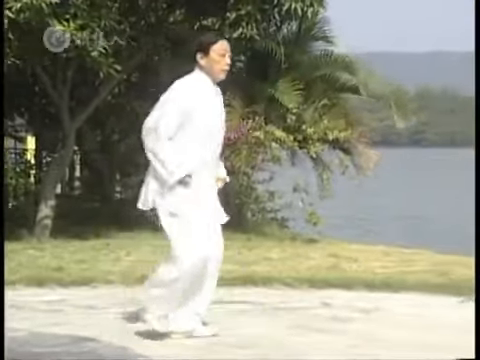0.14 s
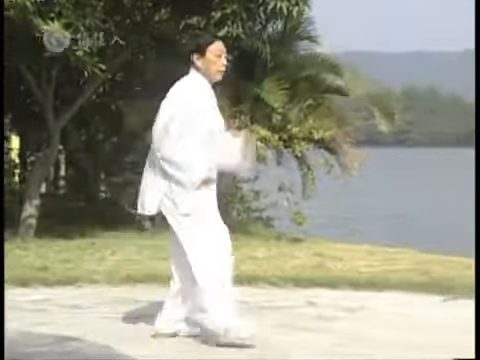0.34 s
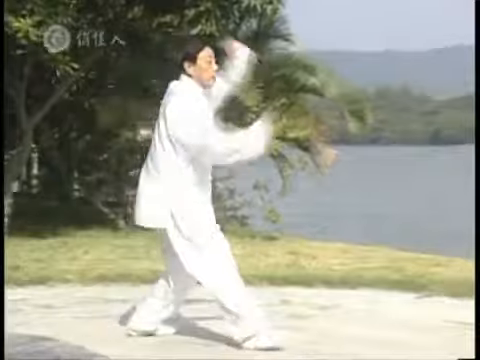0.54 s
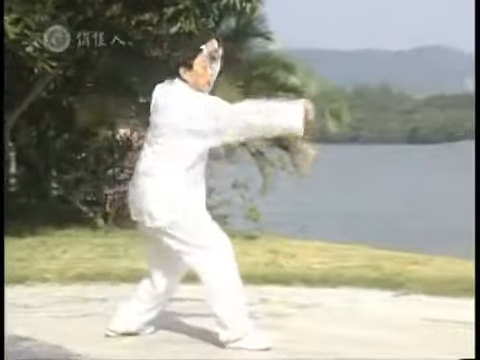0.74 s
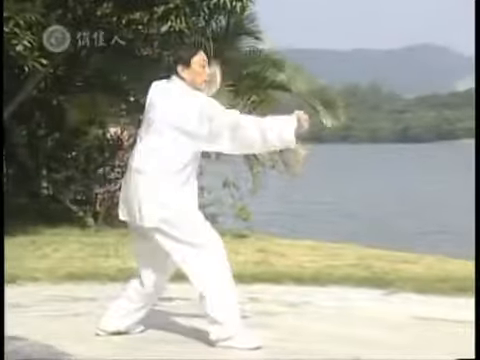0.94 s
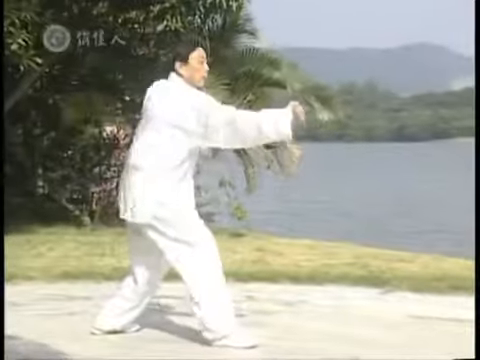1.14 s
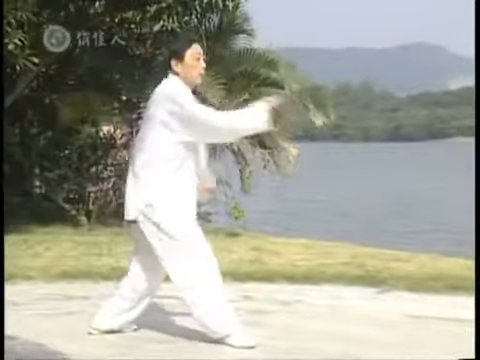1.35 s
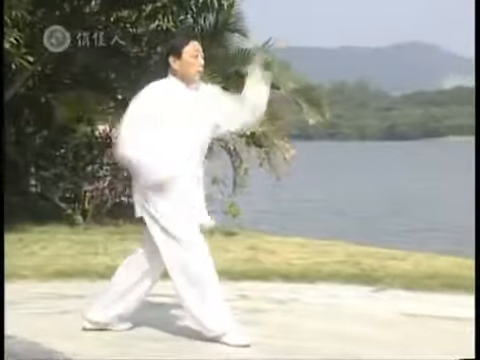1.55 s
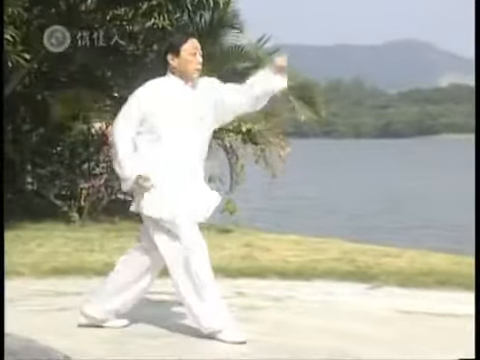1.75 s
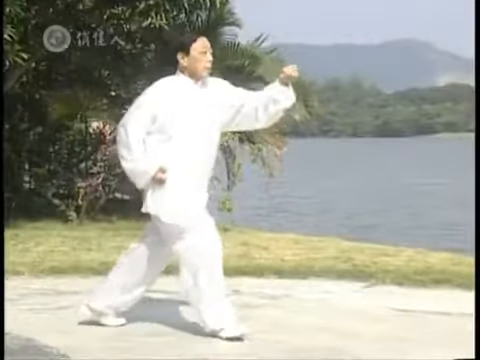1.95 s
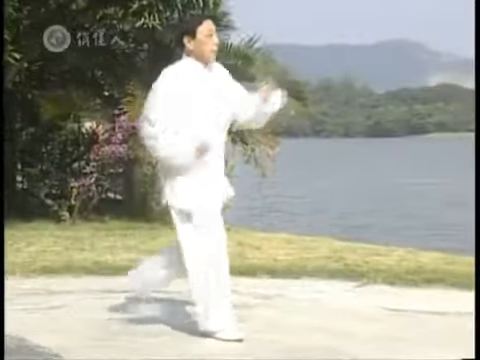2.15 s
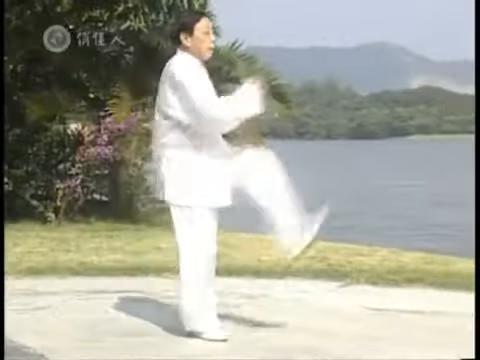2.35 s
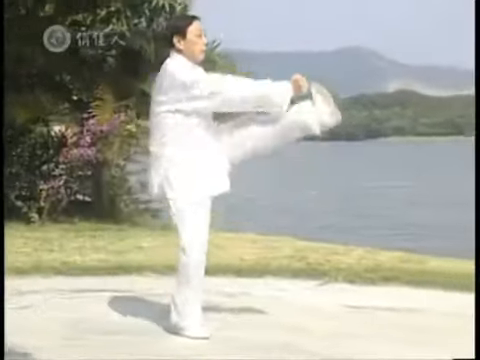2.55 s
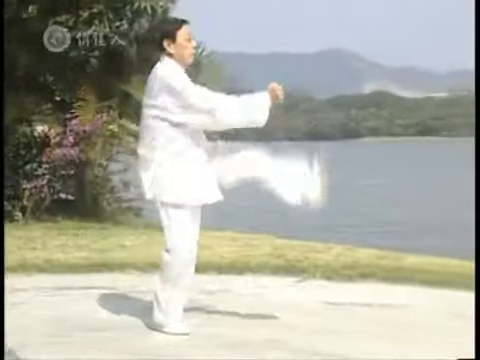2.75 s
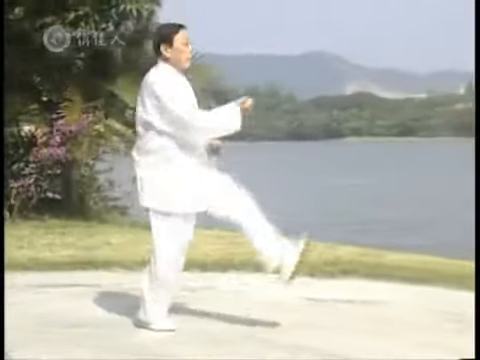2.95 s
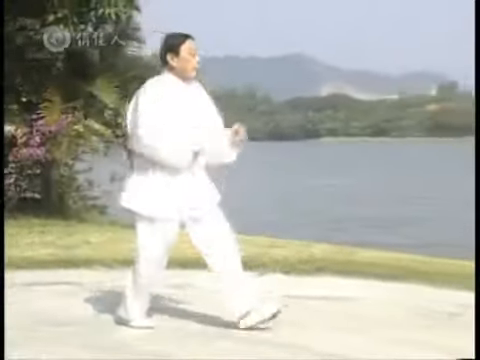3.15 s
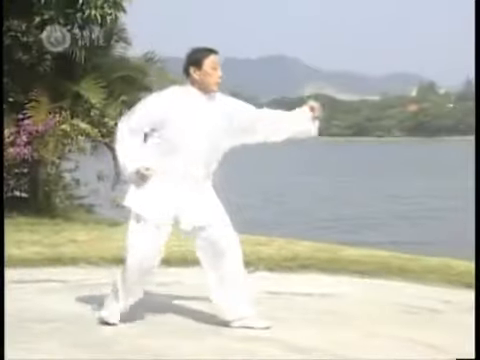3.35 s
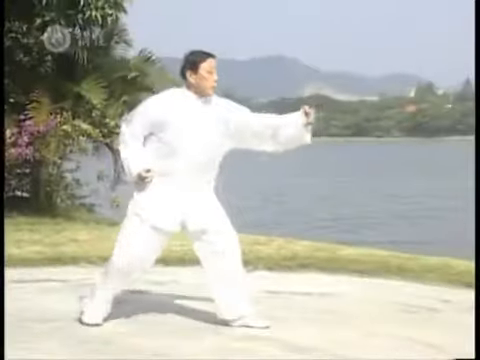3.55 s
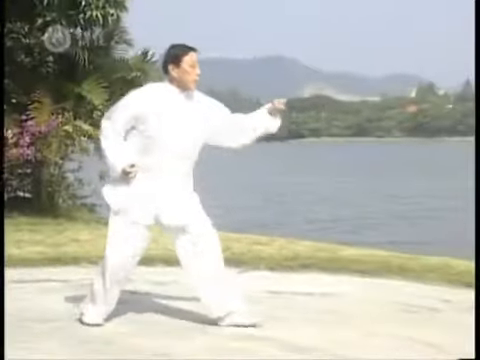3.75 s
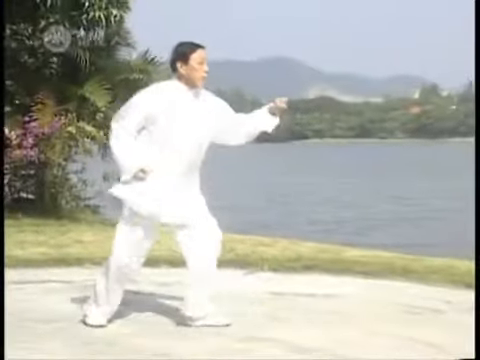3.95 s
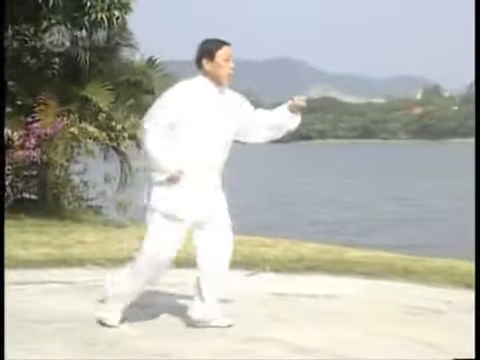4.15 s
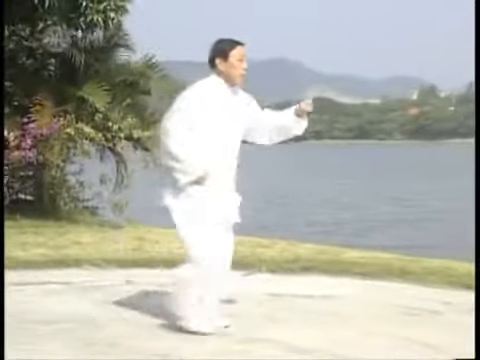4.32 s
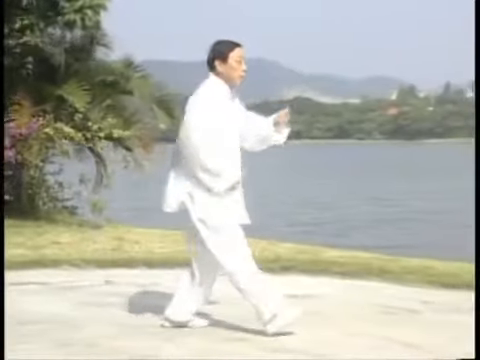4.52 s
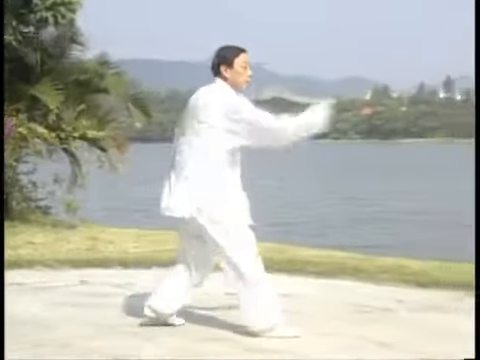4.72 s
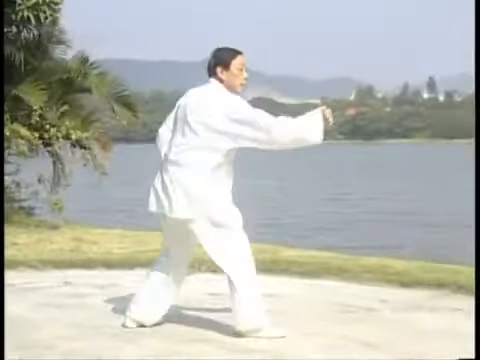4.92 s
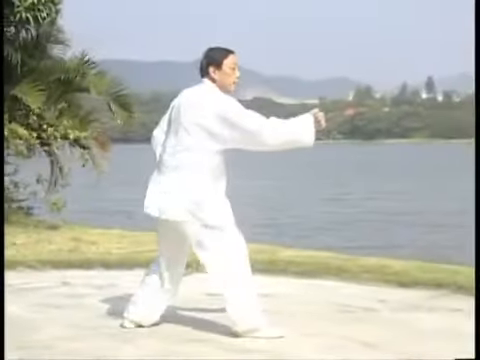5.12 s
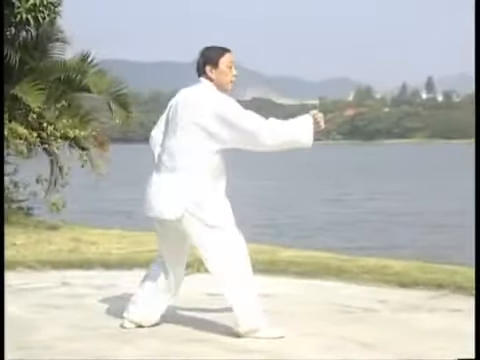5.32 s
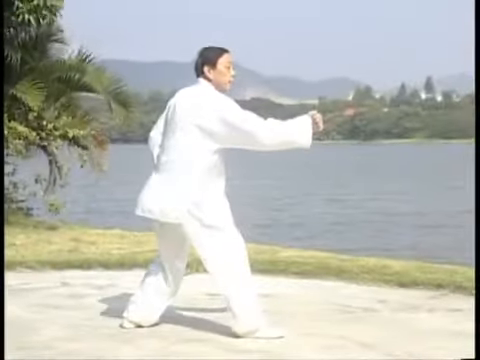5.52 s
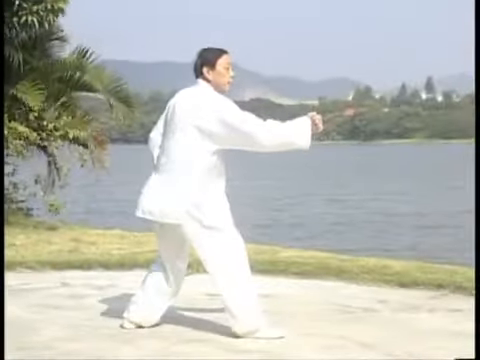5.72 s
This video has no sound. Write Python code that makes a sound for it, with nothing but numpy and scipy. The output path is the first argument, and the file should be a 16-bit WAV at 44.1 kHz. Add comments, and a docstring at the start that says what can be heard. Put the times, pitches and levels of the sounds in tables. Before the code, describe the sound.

Heard nearly in mono from a microphone worn on the body, loose clothing whips through a series of martial arts moves outdoors. It starts with a crackling flap and a thump, then swishes come in uneven clusters with dull footfalls on pavement, small dry ticks and sharp snaps of cloth dragging over the microphone. Near the end the movement settles, leaving light rustle over a faint far rumble, electrical hum and hiss.

```python
"""Loose clothing flaps and swishes fast around a body-worn microphone, outdoors.
Sleeves push air, cloth rubs on cloth, taut fabric crackles over the capsule and knocks,
folds and grit tick, steps and sudden stops thump through the body.
Under it lie a far rumble, a mains-like hum and a steady hiss, nearly mono."""
import sys
import numpy as np
from scipy.fft import rfft, irfft, next_fast_len
from scipy.io import wavfile
from scipy.ndimage import map_coordinates

SR = 44100
rng = np.random.default_rng(int(sys.argv[2]) if len(sys.argv) > 2 else 0)


def master_out(mix):
    """Clip the mix to full scale and print it as 16-bit PCM to the path in sys.argv[1]."""
    frames = np.transpose(np.atleast_2d(mix))
    ceiling = np.clip(frames, -1, 1)
    pcm = np.round(ceiling * 32767).astype(np.int16)
    wavfile.write(sys.argv[1], SR, pcm)


N = 254884

# Sleeve and trouser swings: t/s, rise/s, hold/s, fall/s, flap/dB, rub/dB, whip/dB, sheen/dB
SWINGS = [(0.0, .01, 0.0044, 0.035, -16.5, -28, -44, -42.5), (0.51, .02, 0.047, .04, -30, -52, -74, -60.5),
          (0.61, 0.072, 0.053, 0.068, -29, -29, -45, -53),
          (0.70, 0.031, 0.057, 0.027, -35, -41, -51, -54.5),
          (0.83, 0.018, 0.029, 0.065, -37, -38.5, -49.5, -54),
          (0.905, .03, 0.058, 0.11, -39, -40, -44.5, -50), (1.01, 0.06, .02, .06, -38.5, -41, -52.5, -59),
          (1.10, 0.13, 0.11, 0.1, -38.5, -48, -57, -61.5),
          (1.25, 0.068, 0.021, 0.026, -33, -45.5, -68, -63),
          (1.37, 0.1, .08, 0.093, -40.5, -37.5, -54, -58.5),
          (1.532, 0.014, .012, 0.039, -29, -30, -32, -44.5),
          (1.585, 0.096, 0.01, 0.06, -19, -31.5, -43, -44.5),
          (1.65, 0.033, 0.041, 0.045, -36, -46, -59, -60), (1.713, .02, 0.0065, 0.03, -21, -34.5, -49, -61),
          (2.33, 0.068, 0.027, 0.09, -32, -39.5, -52, -55), (2.59, 0.088, 0.035, 0.16, -36, -43, -54, -60),
          (2.72, 0.031, .005, 0.047, -52, -44.5, -58, -72),
          (3.07, 0.037, 0.0086, 0.061, -68, -53, -50, -61),
          (3.14, .05, 0.089, 0.039, -35.5, -46.5, -61, -58.5),
          (3.222, 0.021, 0.013, 0.046, -22, -32, -36.5, -39.5),
          (3.305, 0.035, 0.014, .02, -41.5, -46, -49.5, -60),
          (3.355, 0.081, 0.013, 0.034, -36, -50.5, -59, -60),
          (3.415, .04, 0.018, 0.033, -36.5, -47, -57, -76), (3.55, 0.086, 0.024, 0.021, -48, -48, -58, -60),
          (3.78, 0.036, 0.016, 0.1, -38.5, -50, -67, -58), (3.865, .02, 0.034, .15, -39.5, -73, -62.5, -65),
          (4.18, 0.19, 0.034, 0.067, -34.5, -49.5, -56, -61.5),
          (4.365, 0.034, 0.0074, .03, -39.5, -63, -74, -72), (4.44, 0.027, 0.0089, .03, -38, -59, -68, -68),
          (4.515, 0.1, 0.043, 0.042, -33, -43.5, -54, -53.5),
          (4.59, 0.036, 0.021, 0.036, -47, -43, -60, -57),
          (4.635, 0.04, 0.025, 0.057, -20, -37, -53, -55.5),
          (4.68, .03, 0.024, 0.12, -29, -42.5, -53.5, -62.5),
          (4.80, 0.07, 0.01, 0.062, -36.5, -69, -80, -68)]
# Cloth between swings: flap/dB, rub/dB, whip/dB, sheen/dB
REST_DB = (-47, -57.5, -68.5, -71.5)
# Body stir, added to REST_DB: t/s, offset/dB
STIR = [(0.0, 9), (0.15, -6), (0.48, 0), (1.8, -1), (2.0, -3.5), (2.3, 2.5), (2.9, 1.5), (3.2, 3),
        (3.7, 2.5), (4.0, -0.5), (4.45, 0.5), (4.9, -4.5), (5.5, -4), (5.78, 0.5)]


def swing_levels():
    """Limbs swing over a stirring body: flap, rub, whip and sheen envelopes in dB."""
    return bursts(SWINGS, np.array(REST_DB)[:, None] + curves(STIR))


# Air push, rub, mid swish, high swish: f/Hz, relative level/dB
FLAP_SPECTRUM = [(15, -40), (28, -2), (50, 2.5), (100, 0), (180, -7), (300, -17), (600, -42.5)]
RUB_SPECTRUM = [(90, -25), (200, 4.5), (330, 0.5), (600, -4.5), (1100, -15), (2000, -25), (5000, -63)]
WHIP_SPECTRUM = [(500, 2.5), (1100, 6), (1700, 2.5), (2600, -5), (4000, -36), (8000, -65)]
SHEEN_SPECTRUM = [(1500, -11.5), (3000, 2), (4200, 1), (6300, -5.5), (8000, -13), (12000, -32)]


def cloth(flap_db, rub_db, whip_db, sheen_db):
    """Sleeves push air; folds catch and let go, so rub and swish flutter together."""
    flutter = wobble(60)
    flap = unit(amp(1.5 * wobble(25)) * noise(FLAP_SPECTRUM))
    rub = unit(amp(2.15 * flutter) * coloured(grit(300, 2.2, share=0.38), RUB_SPECTRUM))
    fibres = amp(1.56 * flutter) * grit(700, 5.7, share=0.32)
    whip = unit(coloured(fibres, WHIP_SPECTRUM))
    sheen = unit(coloured(fibres, SHEEN_SPECTRUM))
    return amp(flap_db) * flap + amp(rub_db) * rub + amp(whip_db) * whip + amp(sheen_db) * sheen


# Steps and stops: t/s, peak/dB, nominal f/Hz, t60/s
THUMPS = [(0.017, -17.5, 81.5, 0.077), (0.533, -24.5, 121, 0.029), (0.56, -22.5, 62, 0.072),
          (0.624, -26, 112, 0.025), (0.646, -8, 121, 0.013), (0.668, -18, 97, 0.051),
          (0.731, -33.5, 145, 0.06), (1.431, -29, 175, 0.1), (1.517, -22.5, 141, 0.044),
          (1.54, -26, 131, 0.053), (1.574, -17, 142, 0.027), (1.591, -14.5, 147, 0.081),
          (1.607, -15, 61.3, 0.076), (1.675, -25.5, 130, 0.036), (1.723, -18, 89.5, 0.085),
          (2.318, -31, 116, 0.038), (2.336, -30, 202.5, 0.37), (2.593, -24.5, 84.5, 0.081),
          (3.229, -18.5, 81, 0.045), (3.242, -18.5, 136, 0.054), (3.286, -26.5, 86, 0.2),
          (3.513, -23.5, 73, 0.074), (3.13, -37, 69.5, 0.051), (4.202, -19, 122, 0.053),
          (4.517, -30, 133, 0.065), (4.646, -15, 174, 0.076), (4.676, -23, 59.5, 0.05),
          (4.702, -28, 44.3, 0.05)]


def thumps():
    """A soft push: quick swell, then a few cycles that sink in pitch as the body settles."""
    out, t = np.zeros(N + SR), np.arange(SR // 4) / SR
    for s, db, hz, t60_s in THUMPS:
        cycles = hz * (0.71 * t + 0.006724 * (1 - np.exp(-t / 0.011)))  # 1.32 to 0.71 x nominal
        push = -np.sin(2 * np.pi * cycles) * amp(-60 * t / t60_s) * (1 - np.exp(-t / 0.0046))
        add(out, s, amp(db) * push / np.abs(push).max(), lead=round(0.00591 * SR))
    return out[:N]


# Fabric dragged over the capsule: t/s, hold/s, level/dB
DRAGS = [(0.0, 0.02, -38), (0.5, 0.055, -60), (0.606, 0.017, -58), (0.683, 0.018, -55), (0.72, 0.02, -51.5),
         (1.356, 0.063, -62), (1.557, .02, -58), (1.588, 0.01, -34.5), (1.613, .012, -50),
         (1.645, 0.098, -58.5), (3.219, 0.04, -43), (3.294, 0.025, -53.5), (3.35, 0.024, -55.5),
         (3.402, 0.032, -53.5), (3.551, 0.015, -54), (3.782, .012, -61.5), (4.659, 0.026, -51),
         (4.7, 0.092, -64.5)]
# Loudest snaps: t/s, peak/dB
SNAPS = [(0.0109, -21), (0.0192, -26), (0.0304, -32), (0.7238, -30), (1.4197, -34), (1.5728, -29),
         (1.5904, -19), (1.5966, -17), (1.621, -26), (1.6271, -32), (1.665, -34), (3.2164, -22),
         (3.2225, -21), (3.2253, -19), (3.2289, -14), (3.2349, -20), (3.2378, -23), (3.2514, -22),
         (3.2566, -22), (3.2597, -26), (3.2685, -29), (3.3039, -28), (3.3079, -26), (3.3122, -23),
         (3.4065, -34), (3.4238, -28), (3.4303, -30), (3.5508, -34), (3.5674, -34), (3.7864, -37),
         (4.66, -31), (4.6714, -33), (4.6785, -29)]
DRAG_EDGE_S, DRAG_REST_DB = 0.019, -78.5


def crackle():
    """Threads slip over the capsule: a dense stream of small spikes, and single loud snaps."""
    drags = [(s, DRAG_EDGE_S, hold_s, DRAG_EDGE_S, db) for s, hold_s, db in DRAGS]
    (crackle_db,) = bursts(drags, DRAG_REST_DB)
    slips = amp(2 * wobble(150)) * grit(1500, 4, share=0.7)
    stream = np.convolve(slips, spike(half_width_s=2e-5), "same")
    stream = unit(coloured(stream, [(200, -54), (1200, -18.5), (3000, -16.5), (22000, 10)]))
    lesser = random_events(per_s=200, level_db=crackle_db + 19.5, scatter_db=5)
    snaps = np.zeros(N + SR)
    for s, db, *_ in [*SNAPS, *lesser]:
        add(snaps, s, -amp(db) * spike(half_width_s=3e-5), lead=64)
    return amp(crackle_db) * stream + snaps[:N]


# Cloth knocks: t/s, peak/dB, f/Hz
KNOCKS = [(0.504, -32, 246), (0.543, -23.5, 252), (0.825, -32.5, 301), (1.211, -32.5, 283),
          (1.363, -31, 330), (1.524, -25.5, 600), (1.7, -28, 356), (1.707, -20, 242), (2.052, -44.5, 640),
          (2.579, -25.5, 267), (2.716, -33, 490), (3.616, -57, 280), (4.198, -37, 265), (4.97, -42, 338)]
KNOCK_T60_CYCLES = 6.1


def knocks():
    """Cloth pulled taut gives a short, dull ring."""
    out, t = np.zeros(N + SR), np.arange(1500) / SR
    for s, db, hz in KNOCKS:
        envelope = amp(-60 * t * hz / KNOCK_T60_CYCLES) * (1 - np.exp(-t / 0.00054))
        ring = np.sin(2 * np.pi * hz * t) * envelope
        add(out, s, -amp(db) * ring / ring.max(), lead=0)
    return out[:N]


# Clearest ticks: t/s, peak/dB, f/Hz
TICKS = [(0.1525, -52, 4060), (0.5598, -36, 3500), (0.6428, -34, 3040), (0.668, -31, 2160),
         (0.697, -33, 3200), (0.8311, -38, 3060), (1.0229, -34, 3060), (1.3913, -37, 3410),
         (1.4603, -38, 2520), (1.5313, -26, 2460), (1.562, -25, 2460), (2.3345, -34, 2930),
         (2.3451, -35, 3210), (2.7193, -41, 2710), (2.8142, -39, 2640), (3.082, -38, 3600),
         (3.619, -46, 2370), (3.6768, -40, 3960), (4.2015, -37, 2030), (4.4545, -43, 4870),
         (4.4585, -42, 4700), (4.5261, -36, 4790), (4.5954, -31, 4840), (4.6178, -35, 4390),
         (4.796, -47, 3620)]
TICK_MEDIAN_HZ, TICK_T60_S = 3570, 0.0022


def ticks(sheen_db):
    """Folds and grit tick drily; lesser random ticks follow the sheen level."""
    out, t = np.zeros(N + SR), np.arange(200) / SR
    events = random_events(per_s=37, level_db=sheen_db + 12, scatter_db=3)
    lesser = [(s, db, TICK_MEDIAN_HZ * np.exp(0.24 * z)) for s, db, z in events]
    envelope = amp(-60 * t / TICK_T60_S) * (1 - np.exp(-t / 6e-5))
    for s, db, hz in TICKS + lesser:
        ring = np.sin(2 * np.pi * hz * t) * envelope
        add(out, s, -amp(db) * ring / np.abs(ring).max(), lead=6)
    return out[:N]


# Far rumble: f/Hz, relative level/dB
RUMBLE_SPECTRUM = [(15, -32), (25, 0), (60, -16.5), (130, -18.5), (200, -18.5), (340, -22), (750, -30.5),
                   (2300, -48), (5000, -65)]


def rumble():
    """Distant low noise, drifting in level."""
    return amp(-54.5 + 0.98 * wobble(3.3)) * noise(RUMBLE_SPECTRUM)


# Hum lines: f/Hz, rms level/dB, waver/dB
HUM_LINES = [(100.8, -51, 3.5), (126.5, -58, 4.5), (497, -64, 2.5)]


def hum():
    """Mains-like tones, wavering in level and phase."""
    out, t = np.zeros(N), np.arange(N) / SR
    for hz, db, waver_db in HUM_LINES:
        peak = np.sqrt(2) * amp(db + waver_db * wobble(12))
        out += peak * np.sin(2 * np.pi * hz * t + 1.16 * wobble(9))
    return out


def amp(db):
    """dB to gain."""
    return 10 ** (np.asarray(db) / 20)


def unit(x):
    """Scale to rms 1."""
    return x / np.sqrt(np.mean(x ** 2) + 1e-20)


def curves(rows):
    """Per-sample curve for each column after t/s."""
    s, *columns = np.transpose(rows)
    return [np.interp(np.arange(N) / SR, s, column) for column in columns]


def wobble(knots_per_s):
    """Smooth random curve."""
    knots = rng.standard_normal(int(N * knots_per_s / SR) + 4)
    return map_coordinates(knots, [np.arange(N) * knots_per_s / SR])


def coloured(x, points):
    """Filter by (f/Hz, gain/dB) points on a log axis; -120 dB outside them."""
    size = next_fast_len(N + 8192)
    hz, db = np.transpose(points)
    bins_hz = np.fft.rfftfreq(size, 1 / SR)
    gain = amp(np.interp(np.log(bins_hz + 1), np.log(hz + 1), db, -120, -120))
    return irfft(rfft(x, size) * gain, size)[..., :N]


def noise(spectrum):
    """Coloured noise, rms 1."""
    return unit(coloured(rng.standard_normal(N), spectrum))


def grit(per_s, spread_db, share):
    """Noise, rms 1, with a share of its power in sparse one-way impulses."""
    hit = rng.random(N) < per_s / SR
    size = np.minimum(rng.exponential(size=N), 3)
    grains = -(hit * amp(min(spread_db, 4) * size))
    return np.sqrt(share) * unit(grains) + np.sqrt(1 - share) * rng.standard_normal(N)


def spike(half_width_s):
    """Narrow pulse with long skirts, height 1 at sample 64."""
    return 1 / (1 + (np.arange(-64, 65) / (half_width_s * SR)) ** 2)


def add(track, s, sound, lead):
    """Mix in a sound with its sample number lead at time s."""
    start = round(s * SR) - lead
    track[max(start, 0):start + len(sound)] += sound[max(-start, 0):]


def bursts(rows, rest_db):
    """Envelopes in dB: bursts power-summed with the rest level, 20 dB per rise or fall time."""
    t, power = np.arange(N) / SR, amp(2 * np.asarray(rest_db))
    for s, rise_s, hold_s, fall_s, *db in rows:
        before = np.maximum(s - t, 0) / rise_s
        after = np.maximum(t - s - hold_s, 0) / fall_s
        burst_db = np.array(db)[:, None] - 20 * (before + after)
        power = power + amp(2 * burst_db)
    return 10 * np.log10(power)


def random_events(per_s, level_db, scatter_db):
    """Poisson events around a level curve: t/s, peak/dB, normal deviate."""
    s = np.cumsum(-np.log(1 - rng.random(3000))) / per_s
    inside = s < N / SR
    s, deviates = s[inside], rng.standard_normal((3000, 2))[inside]
    peak_db = level_db[(s * SR).astype(int)] + scatter_db * deviates[:, 0]
    return np.c_[s, peak_db, deviates[:, 1]]


def scene():
    """One capsule hears everything; both channels carry it."""
    flap_db, rub_db, whip_db, sheen_db = swing_levels()
    clothing = cloth(flap_db, rub_db, whip_db, sheen_db) + crackle() + knocks() + ticks(sheen_db)
    mono = clothing + thumps() + rumble() + hum()
    return np.array([mono, mono])


# Treble roll-off of the whole sound: f/Hz, gain/dB
TREBLE_ROLLOFF = [(20, -3), (9000, -2), (11500, -5), (12500, -12), (13700, -31)]
# Steady hiss, and faint treble noise that differs between the channels: f/Hz, relative level/dB
MID_HISS_SPECTRUM = [(300, 8), (3000, -2.5), (10500, -2), (11300, -4), (11800, -45), (13500, -36)]
SIDE_HISS_SPECTRUM = [(20, -18), (3500, -24), (6000, -13), (8500, -7), (11000, -1), (12200, -13),
                      (13700, -18)]
BOTTOM_HZ, TOP_HZ = 5, 13824


def record(dry):
    """Treble roll-off, steady hiss, faint stereo hiss, band limit."""
    mid = coloured(dry, TREBLE_ROLLOFF) + amp(-72.5) * noise(MID_HISS_SPECTRUM)
    side = amp(-85.5) * noise(SIDE_HISS_SPECTRUM)
    return coloured(mid + side * np.array([[1], [-1]]), [(BOTTOM_HZ, 0), (TOP_HZ, 0)])


dry = scene()
out = record(dry)
master_out(out)
```